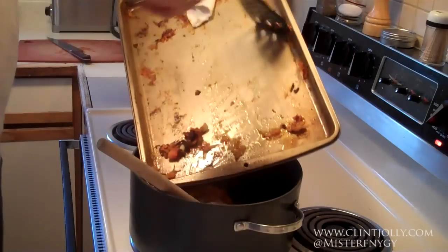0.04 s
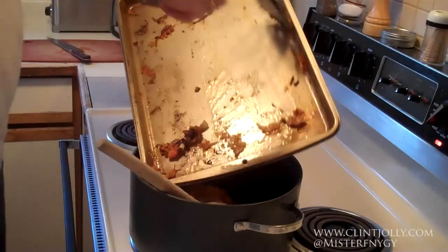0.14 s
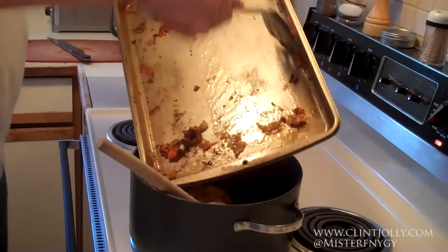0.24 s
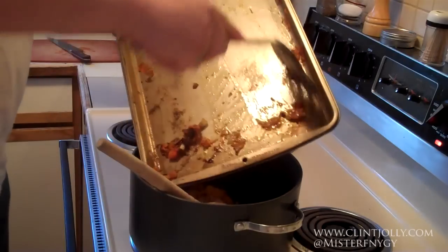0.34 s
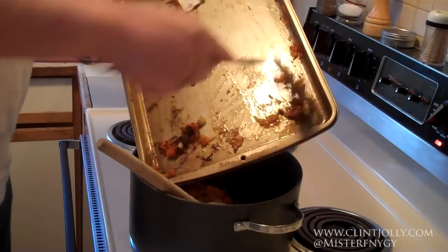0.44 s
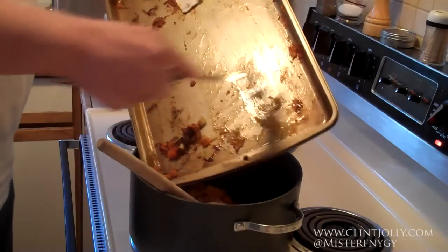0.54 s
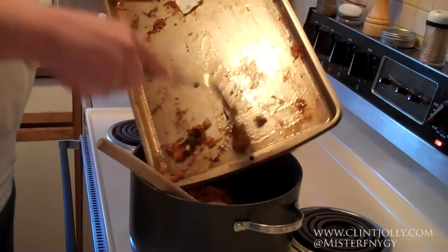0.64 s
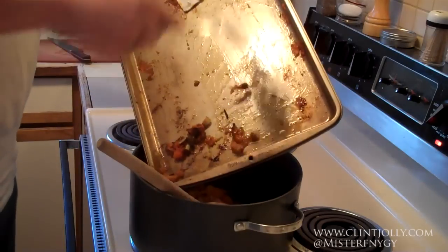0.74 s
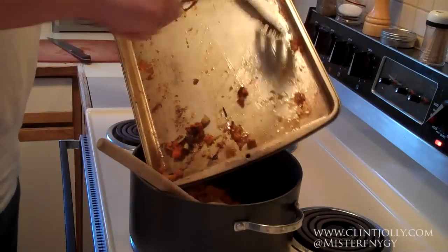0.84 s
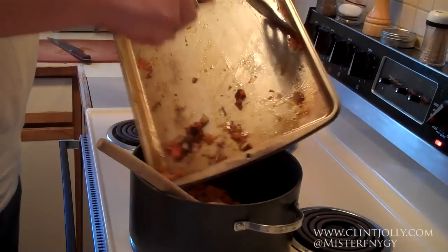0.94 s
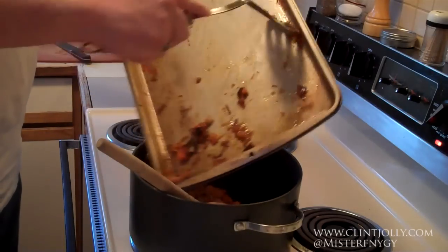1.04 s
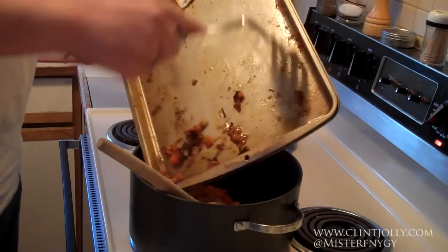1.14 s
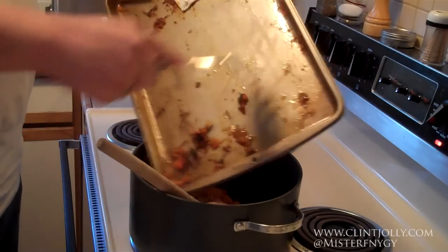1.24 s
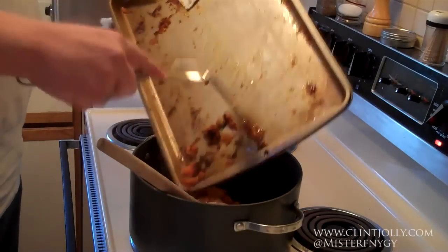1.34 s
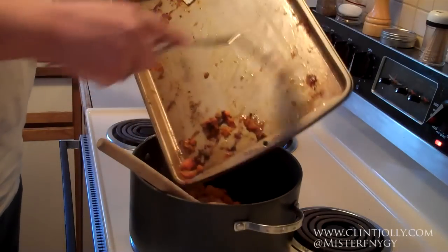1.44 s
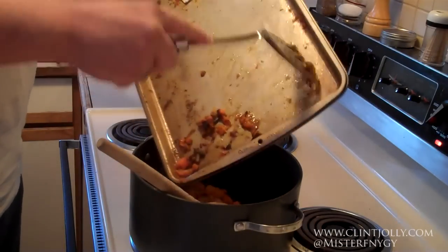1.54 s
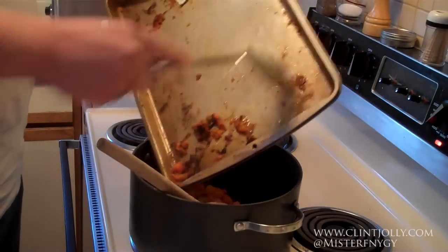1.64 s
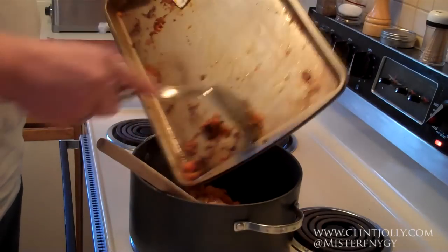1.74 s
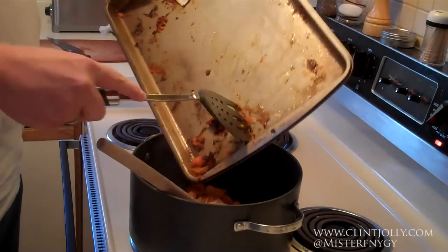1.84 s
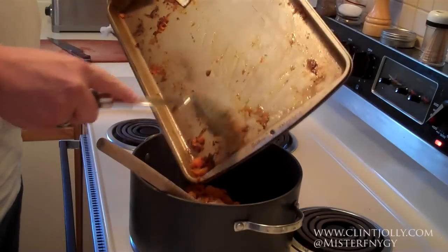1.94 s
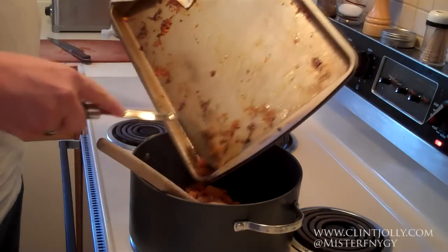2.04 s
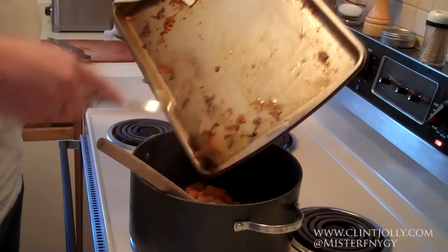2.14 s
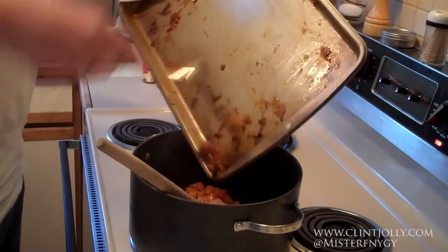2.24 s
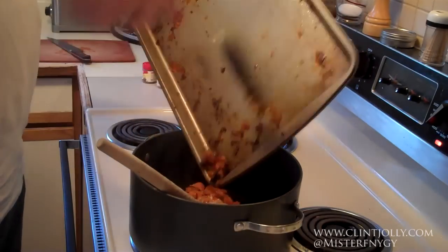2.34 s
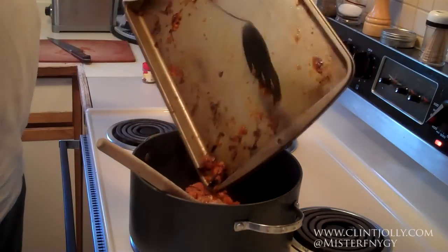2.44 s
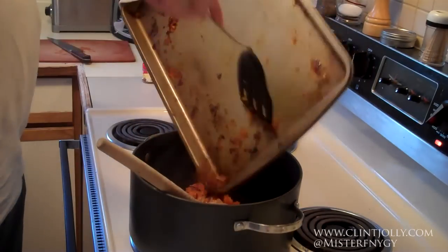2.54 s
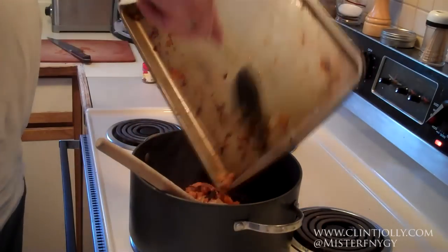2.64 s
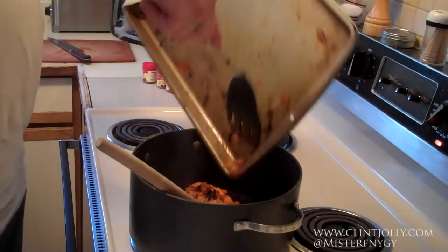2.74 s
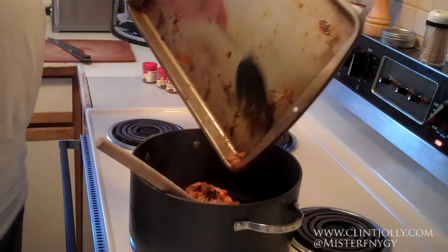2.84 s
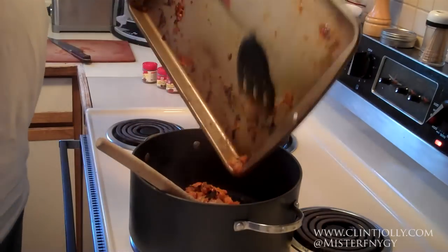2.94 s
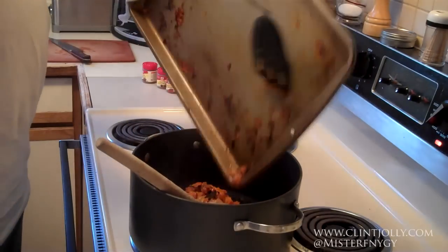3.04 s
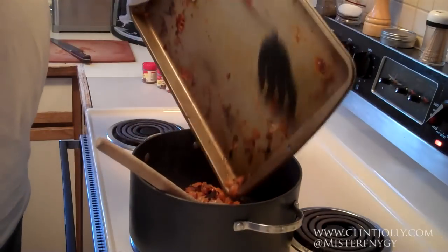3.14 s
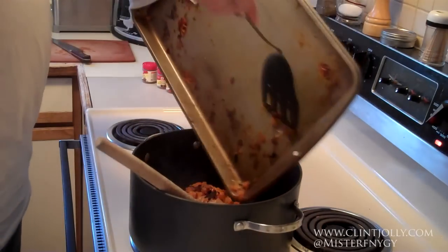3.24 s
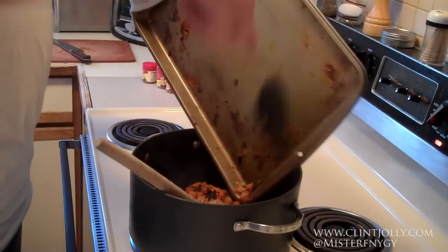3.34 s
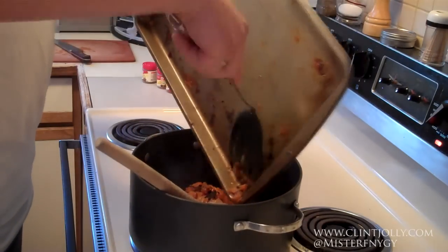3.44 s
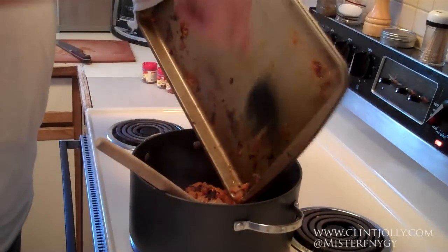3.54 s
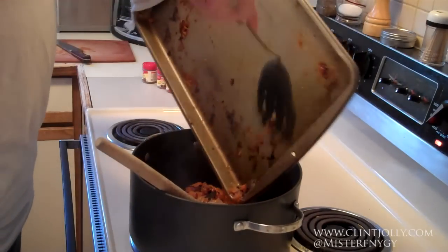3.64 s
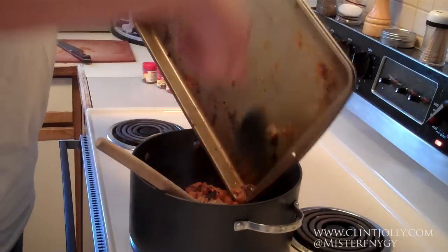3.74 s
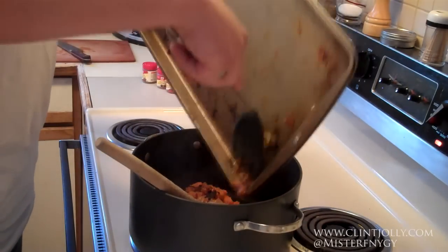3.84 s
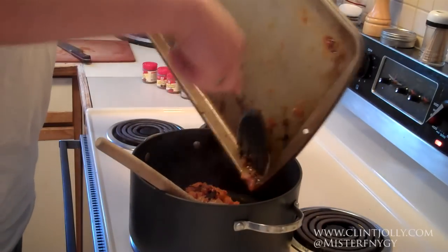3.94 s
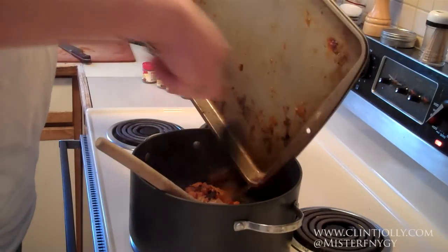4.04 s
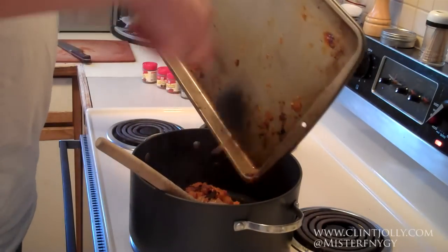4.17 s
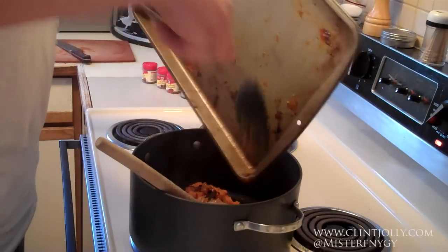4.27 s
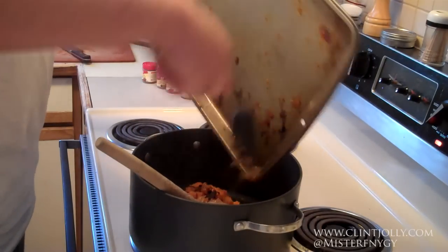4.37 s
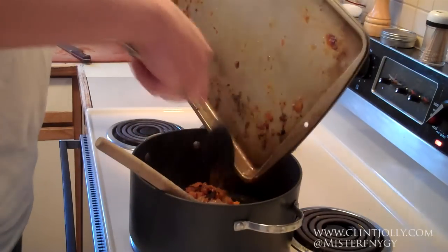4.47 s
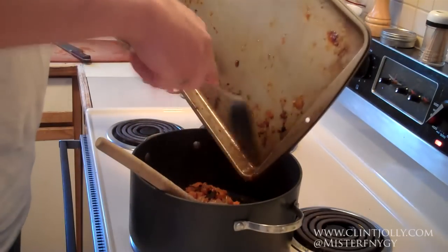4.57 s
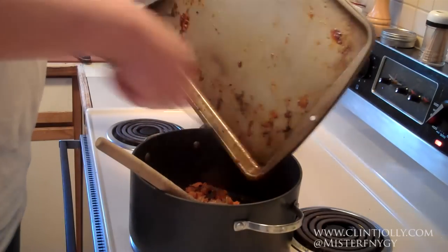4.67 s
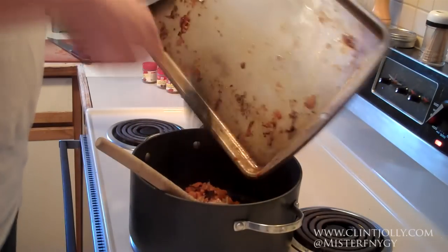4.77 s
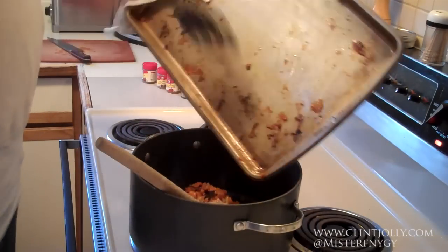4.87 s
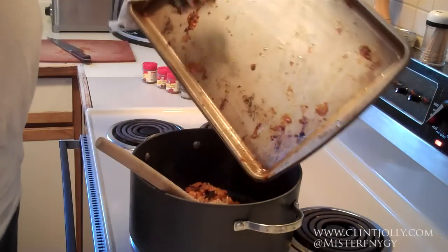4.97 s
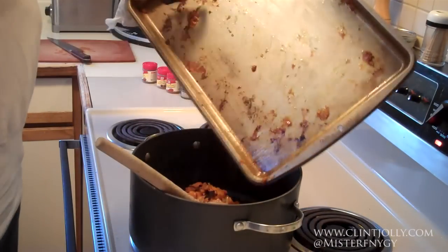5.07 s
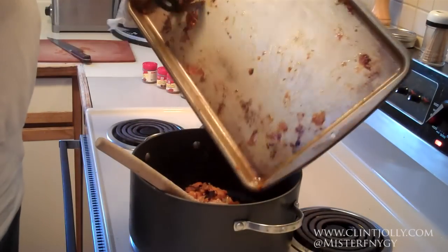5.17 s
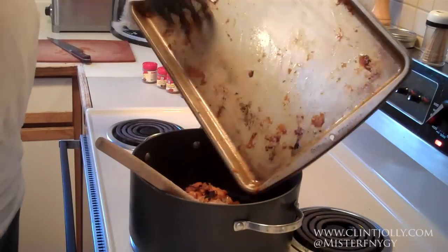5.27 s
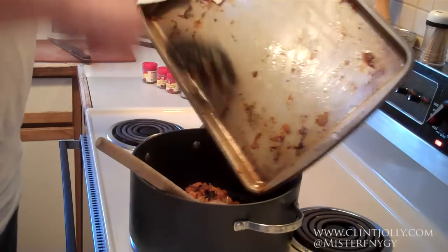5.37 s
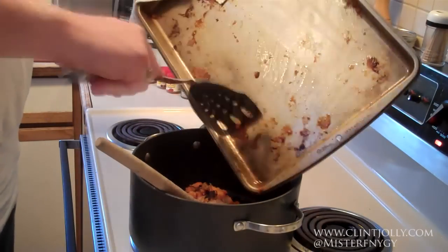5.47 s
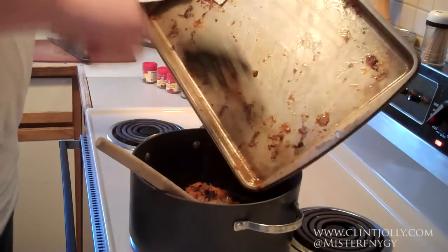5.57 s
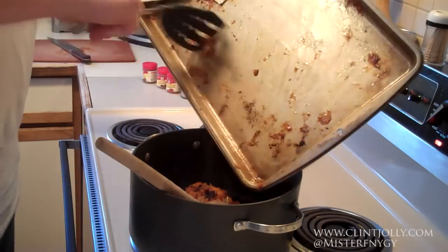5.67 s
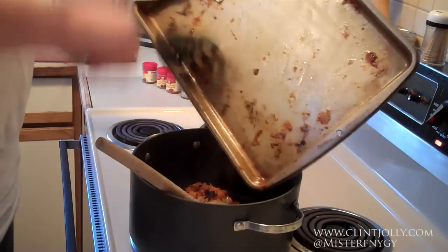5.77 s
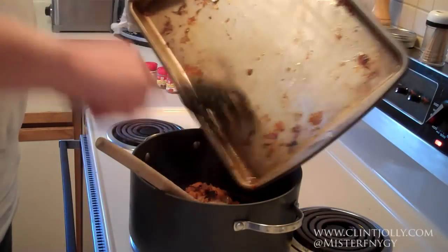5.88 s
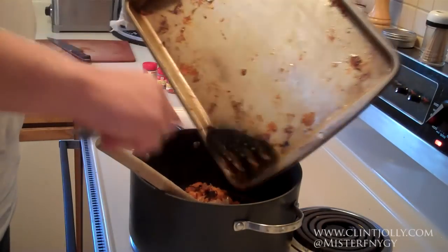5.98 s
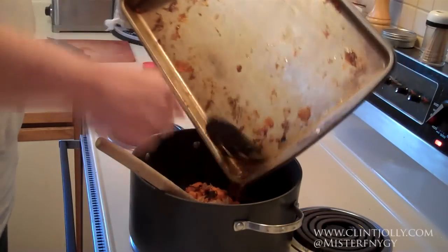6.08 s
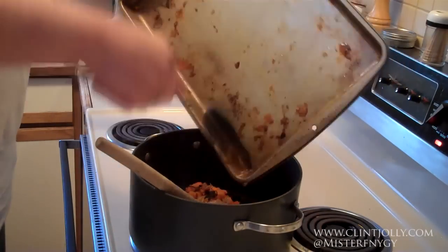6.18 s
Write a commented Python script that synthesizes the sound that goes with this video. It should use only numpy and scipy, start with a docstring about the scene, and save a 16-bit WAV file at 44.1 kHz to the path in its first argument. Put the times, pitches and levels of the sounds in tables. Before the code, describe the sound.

A slotted turner scrapes grittily across a thin metal baking sheet in short strokes, with sharp clanking knocks, over a pot in a small kitchen.

```python
"""Gritty scrapes and metallic knocks: a slotted turner on a thin baking sheet held over a pot, small kitchen.
Grit under the edge and single blows drive the sheet's thicket of modes; bumps on the pot rim hum low.
The sheet's corner rubs the rim with a faint squeal that stirs the pot, over a quiet steady room tone.
Two microphone ports with unlike resonances hear it, clip on the hardest blows and hiss faintly."""
import sys
import numpy as np
from scipy import signal
from scipy.fft import rfft, irfft, next_fast_len
from scipy.io import wavfile
from scipy.ndimage import uniform_filter1d

SR = 44100
rng = np.random.default_rng(int(sys.argv[2]) if len(sys.argv) > 2 else 0)


def wav_record(signal):
    """Record a signal, one row per channel, as 16-bit PCM in the file named by sys.argv[1]."""
    frames = np.transpose(np.atleast_2d(signal))
    bounded = np.clip(frames, -1, 1)
    # unit amplitude maps onto the largest positive 16-bit level
    quanta = np.round(bounded * 32767).astype(np.int16)
    wavfile.write(sys.argv[1], SR, quanta)


N = 273861
SIZE = next_fast_len(N + 2 * SR)  # transform length, with space for the tails
HZ = np.maximum(np.fft.rfftfreq(SIZE, 1 / SR), 1)
T = np.arange(N) / SR

# Room tone of the kitchen, spectrum before its overall level is set: f/Hz, level/dB per Hz
ROOM_TONE = [(18, -47.5), (30, -16), (130, -12), (169, -10), (202, -10), (469, -12), (585, -14.5),
             (1090, -16.5), (6000, -40.5), (7800, -68), (13200, -120)]
# Stereo width of the sound field: f/Hz, side minus mid level/dB
STEREO_WIDTH = [(60, -8.5), (200, -26), (700, -10.5), (1290, -6.5), (2380, -3.5), (4400, 2.5), (8000, 2.5)]
# Resonances of the pot: f/Hz, width/Hz, level/dB
POT_MODES = [(1630, 40, 10), (1950, 100, 9), (2430, 18, 6), (3040, 30, -6), (4600, 55, -12)]
# Low bumps of the sheet on the pot rim: t/s, level/dB
RIM_BUMPS = [(1.572, -8), (2.533, 0), (2.601, -5.5), (3.57, -10), (3.83, -3), (4.398, -6), (4.68, -1),
             (5.3, -4), (5.719, -7), (5.871, 8)]
# Turner dragging: start t/s, time to full pressure/s, level/dB, easing off/dB per s (size only),
# bass level/dB and treble level/dB, both against the middle and at full pressure
DRAG_STROKES = [(0.0, 0.00071, -36.5, 13, -4, -6.5), (0.228, 0.0014, -25.5, 250, -2.5, -14),
                (0.252, 0.043, -18, 0, -2, -2.5), (0.392, 0.001, -18, 154, -3, -2),
                (0.432, 0.077, -16.5, 224, -12, -1), (0.571, 0.0022, -22.5, 46, -3, -7),
                (0.654, 0.0017, -29.5, 140, -2.5, -24), (0.913, .002, -23.5, 263, 5, -11),
                (0.971, 0.049, -17.5, 223, -1.5, -7.5), (1.098, 0.0016, -20.5, 76, -3, -3.5),
                (1.217, .002, -25.5, 250, -11, 1), (1.262, 0.044, -19, 157, 0.5, -9.5),
                (1.571, .002, -37.5, 137, 6, -1), (1.637, 0.05, -26.5, 33, -5, -3.5),
                (1.699, 0.0017, -13.5, 108, -2.5, -3), (1.943, 0.04, -19.5, 156, -3.5, -5),
                (2.16, .002, -51.5, -1, 2, -4.5), (2.526, 0.013, -17.5, 301, -2, -11.5),
                (2.609, 0.0019, -19.5, 249, 9.5, 1.5), (2.671, 0.028, -20.5, 135, 4.5, -7),
                (3.127, 0.0026, -13, 311, -8, -3), (3.179, 0.0017, -26.5, 18, -4.5, -6),
                (3.321, 0.0015, -29, 56, -2, -0.5), (3.475, .12, -33.5, 100, -9, -4),
                (3.672, 0.065, -19.5, 155, -4, -1), (3.86, .002, -41.5, 31, 3.5, -6.5),
                (4.304, 0.016, -21.5, 137, -8.5, -6), (4.671, 0.0024, -32.5, 165, 15, -7.5),
                (5.201, .002, -36.5, 264, 14, -10), (5.253, 0.0026, -21, 199.5, 4.5, -6.5),
                (5.309, .02, -26, 62.5, 10.5, -13), (5.367, 0.074, -15.5, 158, -7.5, -3),
                (5.716, 0.0014, -30, 140, 13, -21), (5.764, 0.033, -18, 1, -11, -5.5),
                (5.82, 0.054, -9.5, 94, -5.5, -6.5)]
# Turner striking: t/s, level/dB, bass level/dB and treble level/dB, both against the middle
TURNER_BLOWS = [(0.0771, .5, -14, -13.5), (0.2289, -5, 7, -2.5), (0.2775, 7, -6, -18), (0.2995, 7, -14, -1),
                (0.3226, 8.5, -2, -3.5), (0.3683, 13.5, -17, -5), (0.4968, -20, -24, -13),
                (0.911, 7, -1, -8.5), (0.9765, 2.5, -9, -6), (1.0037, 5, -19, -5), (1.108, 9.5, -19, -11),
                (1.2164, 7.5, -31, -9), (1.297, 10, -36, -15), (1.329, 11, -25, -24), (1.5711, -10, 7, 3),
                (1.6689, -4.5, 1.5, -4), (1.7011, 9.5, 0, 3), (1.7144, -7, 0, 11), (1.942, -7, -24, 6),
                (1.9819, 6, -4, -17), (2.0549, -0.5, 9, -30), (2.5345, 5.5, -5, -4), (2.601, 24, -16, -2),
                (2.611, 13.5, -27, -4.5), (2.6914, 9.5, -11, -16), (3.1272, 19.5, -3.5, -5.5),
                (3.1401, 12, -25, 2), (3.2541, 0, -15, 3), (3.3221, 8, -35, -2.5), (3.3442, 2, -23, 5),
                (3.4192, 0, 7.5, -5), (3.512, -8.5, 2, 1), (3.5745, -2, -15, -1), (3.7138, 14, -20, -4.5),
                (3.745, 12, -3, -5), (4.3029, 4.5, -10, -19), (4.3211, 1, -25, -16), (4.377, -11, -13, 13),
                (4.4184, -17, -2, -8), (4.668, -8.5, 6, -9), (4.6791, -6, 3, -1.5),
                (5.1987, -6.5, 15.5, -11), (5.2535, 4.5, 2, -3.5), (5.3978, 10, -2.5, -15),
                (5.435, 14.5, -32, -9), (5.7186, 2.5, 10, -28), (5.814, 16, -1.5, -7.5),
                (5.8714, 12, -18, -5), (5.9034, 13.5, -20, -27), (6.029, 10, -4, -1.5)]
# Sheet modes that stand out of the thicket: f/Hz, level over the thicket/dB, t60/s
SHEET_MODES = [(94.2, 31.5, 0.41), (161.2, 19.5, 1.56), (170.3, 27.5, 1.2), (191.2, 19, .8),
               (220, 13.5, 0.73), (306.4, 12.5, 0.28), (333.3, 12.5, 1), (491.7, 13, 0.081),
               (561, 13.5, 0.2), (664, 4.5, 0.83), (814.3, 7.5, 0.29), (986, 10.5, 0.48), (1127, 6, 0.36),
               (1145, 12, 0.37), (1272, 4, 0.075), (1408, 0, 0.43), (1420, -6.5, 0.2), (1868, 12, 0.13),
               (2336, -6, 0.3), (2570, 10.5, 0.088), (2513, -7.5, 0.15), (6830, 0, .12),
               (6500, -10.5, 0.082), (7400, 3.5, 0.21)]
# The thicket of close sheet modes: f/Hz, relative level/dB per Hz, t60/s
MODE_THICKET = [(56.6, -31, .15), (202, -2, 0.12), (463, -2.5, 0.22), (1219, 2.5, 0.1), (1580, -1.5, 0.15),
                (2566, 1.5, 0.21), (4620, -5.5, 0.13), (6430, -6, 0.099), (9500, -8, 0.17),
                (14500, -4.5, 0.068)]
# Microphone ports, left then right: resonance f/Hz, width/Hz, roll-off f/Hz
MIC_PORTS = [(7535, 1020, 13000), (6260, 663, 8350)]

ROOM_TONE_DB = -56
ROOM_DB, ROOM_T60_S = -18, 0.67
RUB_FROM_S, RUB_TO_S, RUB_FADE_S = 3.9, 4.92, .1
RUB_DB, RUB_EASE_DB_PER_S = -55, 4  # level as the rub begins, and its decline
SQUEAL_HZ, SQUEAL_SAG_HZ_PER_S = 2720, 145  # mean pitch as the rub begins, and its fall
BITE_DB = -11  # a stroke starts this far under full pressure
BASS_GAIN_PER_DB, TREBLE_LOSS_PER_DB = 0.0869, 0.25  # a lighter touch is duller
DRAG_SHOVE_DB, BLOW_SHOVE_DB = -18.5, -15.5  # flexing of the whole sheet, against the bass
CHATTER_S, CONTACT_S, BUMP_S = 0.0029, .0005, .0015  # decay, onset and bump time constants
CRACK_DB = -5  # contact crack, against the thicket's spectrum
PORT_LAG_S = 3e-5  # the left port hears late
LOPSIDED = 0.217  # share of the squared signal in the left preamp
TOP_HZ = 14300


def undb(db):
    """Turn a level in dB into an amplitude ratio."""
    return 10 ** (np.asarray(db) / 20)


def along(table, hz, axis=1):
    """Read a column of a table on a log-frequency axis."""
    table = np.array(table, float)
    return np.interp(np.log(hz), np.log(table[:, 0]), table[:, axis])


def walk(rate):
    """Random levels held 1 / rate s and slewed; spread near 1."""
    k = int(SR / rate)
    held = np.repeat(rng.standard_normal(N // k + 1), k)
    return 1.365 * uniform_filter1d(held, k)[:N]


def left_right(mid, side, hz):
    """Spread mid and side spectra over two channels, alike in level, by the stereo width table."""
    side = side * undb(along(STEREO_WIDTH, hz))
    return mid + side, mid - side


def shaped(gain, db):
    """Steady two-channel noise of a given spectrum and level, more alike left and right in the bass."""
    mid, side = rfft(rng.standard_normal((2, SIZE)))
    x = irfft(gain * np.array(left_right(mid, side, HZ)), SIZE)[:, :N]
    return x * undb(db) / np.std(x)


def peaks(table):
    """Gain of a set of resonances, summed in power."""
    power = sum(undb(2 * db) / (1 + (2 * (HZ - hz) / width) ** 2) ** 2 for hz, width, db in table)
    return np.sqrt(power)


def room_tone():
    """Background noise of the kitchen, mostly low, its level wavering at random."""
    return shaped(undb(along(ROOM_TONE, HZ)), ROOM_TONE_DB) * undb(1.8 * walk(21))


def room():
    """Direct sound, then a fading diffuse tail from tiles and cupboards with softened treble."""
    t = np.arange(SR // 2) / SR
    noise = rng.standard_normal((2, len(t))) * (t > .004)
    tail = rfft(noise * undb(-60 * t / ROOM_T60_S), SIZE) / np.sqrt(1 + (HZ / 6000) ** 2)
    mid, side = tail / np.sqrt(np.mean(np.abs(tail) ** 2))
    return 1 + undb(ROOM_DB) * np.array(left_right(mid, side, HZ))


def rubbing():
    """The corner squeals faintly and unsteadily on the rim, sinking in pitch, and stirs the ring of the pot."""
    past = T - RUB_FROM_S
    touching = np.clip(np.minimum(past, RUB_TO_S - T) / RUB_FADE_S, 0, 1)
    hz = SQUEAL_HZ - SQUEAL_SAG_HZ_PER_S * past + 50 * walk(250)
    squeal = np.sin(2 * np.pi * np.cumsum(hz) / SR) * undb(2 * walk(60))
    pot_ring = shaped(peaks(POT_MODES) + .15, 0.0)
    return (1.4 * squeal + pot_ring) * undb(RUB_DB - RUB_EASE_DB_PER_S * past) * touching


def thicket(spots):
    """Modes too close to tell apart ring like noise that dies band by band; every spot stirs another mixture."""
    t = np.arange(SR // 3) / SR
    hz = np.maximum(np.fft.rfftfreq(len(t), 1 / SR), 1)
    mid, side = rfft(rng.standard_normal((2, spots, len(t))))
    both = np.stack(left_right(mid, side, hz), axis=1) * undb(along(MODE_THICKET, hz))
    centres, _, t60s = np.transpose(MODE_THICKET)
    ring = 0
    for share, t60 in zip(np.eye(len(centres)), t60s):
        band = np.interp(np.log(hz), np.log(centres), share)
        decay = undb(-60 * t / t60) * np.sqrt(np.log(1000) / t60 / SR)  # evens out the bands' energy
        ring = ring + irfft(both * band, len(t)) * decay
    return rfft(ring, SIZE)


def sheet(spots):
    """Ringing of the sheet at both ports for a tap at each spot: contact crack, thicket and single modes."""
    hz, db, t60 = np.transpose(SHEET_MODES)[..., None]
    damping = np.log(1000) / t60 / (2 * np.pi)  # half width of each resonance, Hz
    modes = undb(db + along(MODE_THICKET, hz)) * damping / (damping + 1j * (HZ - hz))
    # each spot feeds every mode with its own strength and phase
    size, turn, c, d = rng.standard_normal((4, spots, len(SHEET_MODES)))
    mid = undb(4.3 * size) * np.exp(2j * np.pi * turn)
    side = (c + 1j * d) * undb(along(STEREO_WIDTH, hz[:, 0]) - 3.5)
    single = np.stack([mid + side, mid - side], axis=1) @ modes / 2
    crack = undb(CRACK_DB + along(MODE_THICKET, HZ))
    ring = thicket(spots) + single + crack
    middle = (HZ > 900) & (HZ < 5000)
    return ring / np.sqrt(np.mean(np.abs(ring[..., middle]) ** 2))


def grit(rate, spread_db, smooth):
    """Stick-slip of an edge on baked crust: dense clicks of unlike size in uneven runs, over a fine rasp."""
    busy = rate / SR * undb(3.5 * walk(70))  # chance of a click at each sample
    sizes = undb(spread_db * rng.exponential(size=N)) * rng.standard_normal(N)
    clicks = (rng.random(N) < busy) * sizes
    rasp = smooth * rng.standard_normal(N) * undb(2.57 * walk(90))
    x = clicks / np.std(clicks) + rasp
    return x / np.std(x)


def strokes():
    """Each stroke bites, presses up to its level, then eases off until the next one takes over."""
    table = np.transpose(DRAG_STROKES)
    current = np.searchsorted(table[0], T, "right") - 1
    start, rise, db, ease, bass_db, treble_db = table[:, current]
    past = T - start - rise
    under_db = np.where(past < 0, BITE_DB * past / rise, np.abs(ease) * past)
    bass_db = bass_db + BASS_GAIN_PER_DB * under_db
    treble_db = treble_db - TREBLE_LOSS_PER_DB * under_db
    return db - under_db, bass_db, treble_db


def add_bumps(push):
    """Smooth pushes flex the whole sheet as it bumps on the pot rim."""
    t = np.arange(800) / SR
    bump = t * np.exp(-t / BUMP_S)
    bump = bump / np.linalg.norm(bump)
    for s, db in RIM_BUMPS:
        i = int(s * SR)
        push[0, i:i + len(t)] += undb(db) * bump


def add_blows(push):
    """At each blow the hand shoves smoothly while the edge chatters for a moment."""
    t = np.arange(800) / SR
    fade = np.exp(-t / CHATTER_S) - np.exp(-t / CONTACT_S)
    jolts = rng.standard_normal((len(TURNER_BLOWS), len(fade)))
    for (s, db, bass_db, treble_db), jolt in zip(TURNER_BLOWS, jolts):
        i = int(s * SR)
        burst = np.array([fade, jolt * fade, jolt * fade, jolt * fade])
        burst = burst / np.sqrt(np.sum(burst ** 2, axis=1, keepdims=True))
        part_db = np.array([[bass_db + BLOW_SHOVE_DB], [bass_db], [0], [treble_db]])
        push[:, i:i + len(fade)] += burst * undb(db + part_db)


def force():
    """Shove, bass, middle and treble parts of the force on the sheet: dragging, bumps and blows."""
    db, bass_db, treble_db = strokes()
    part_db = np.array([bass_db + DRAG_SHOVE_DB, bass_db, 0 * db, treble_db])
    push = grit(rate=3000, spread_db=2.5, smooth=1.1) * undb(db + part_db)
    add_bumps(push)
    add_blows(push)
    return push


def turner(spots=9):
    """The contact wanders over the sheet, so the modes are fed in changing shares."""
    where = undb(12.0 * np.array([walk(22) for _ in range(spots)]))
    where = where / np.sqrt(np.sum(where ** 2, axis=0))
    shove = 1 / (1 + (HZ / 240) ** 8)
    bass = 1 / (1 + (HZ / 800) ** 6)
    treble = 1 / (1 + (5100 / HZ) ** 10)
    radiated = 1 / (1 + (110 / HZ) ** 4)  # a thin sheet hardly sends out its slowest motion
    bands = np.array([shove * radiated, bass - shove, 1 - bass - treble, treble])
    push = force()
    fed = np.array([np.sum(bands * rfft(push * w, SIZE), axis=0) for w in where])
    return np.sum(sheet(spots) * fed[:, None], axis=0)


def scene():
    """Room tone, the rub on the pot rim, and the turner on the sheet heard in the room."""
    scraping = irfft(turner() * room(), SIZE)[:, :N]
    return room_tone() + rubbing() + scraping


def record(dry):
    """Each port resonates and rolls off; the preamp hisses and clips, the left bends lopsidedly; the top is cut."""
    s = 1j * HZ
    ports = np.array([1 / (1 + s * width / hz ** 2 + (s / hz) ** 2)
                      / (1 + 1.82 * s / edge_hz + (s / edge_hz) ** 2)
                      for hz, width, edge_hz in MIC_PORTS])
    ports[0] *= np.exp(-2 * np.pi * s * PORT_LAG_S)
    hiss = undb(-60) * rng.standard_normal(dry.shape)
    heard = irfft(rfft(dry, SIZE) * ports, SIZE)[:, :N] + hiss
    bend = LOPSIDED * np.minimum(heard[0] ** 2, 1)
    heard = heard - np.array([bend - np.mean(bend), 0 * bend])
    tops = np.array([[.72], [.95]])  # upper clip points, left and right
    clipped = np.clip(heard, -.97, tops)
    top_cut = signal.ellip(10, .2, 70, TOP_HZ, fs=SR, output="sos")
    return signal.sosfilt(top_cut, clipped)


dry = scene()
out = record(dry)
wav_record(out)
```